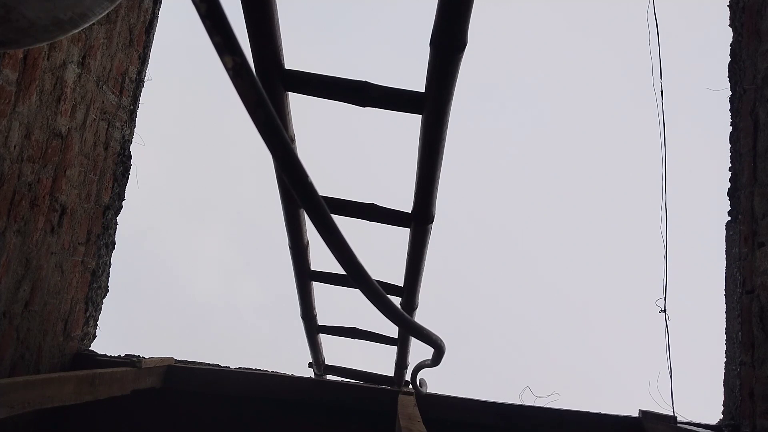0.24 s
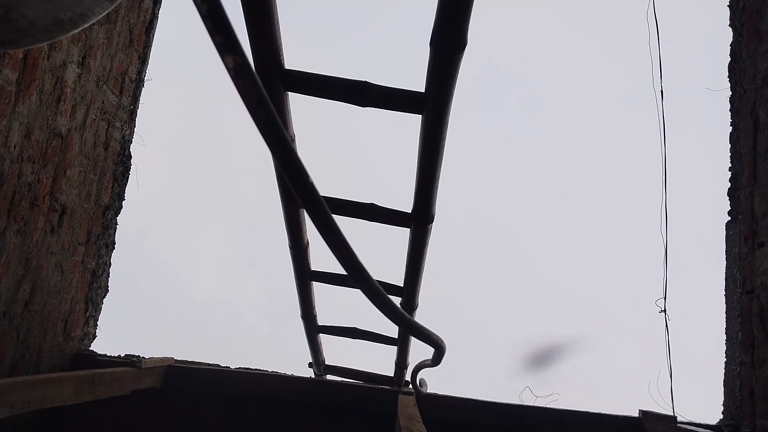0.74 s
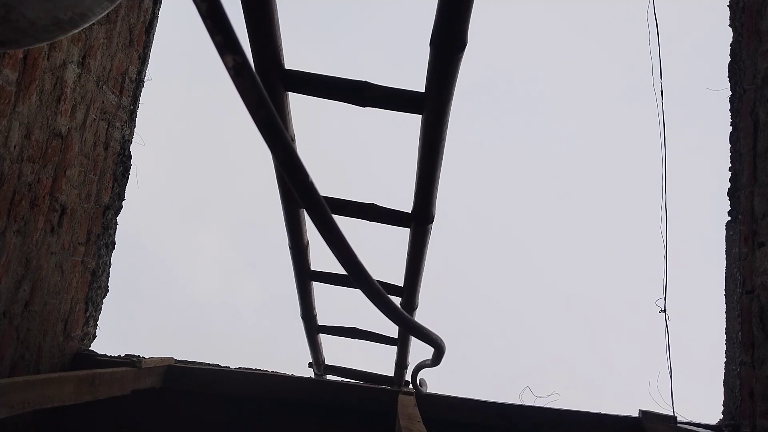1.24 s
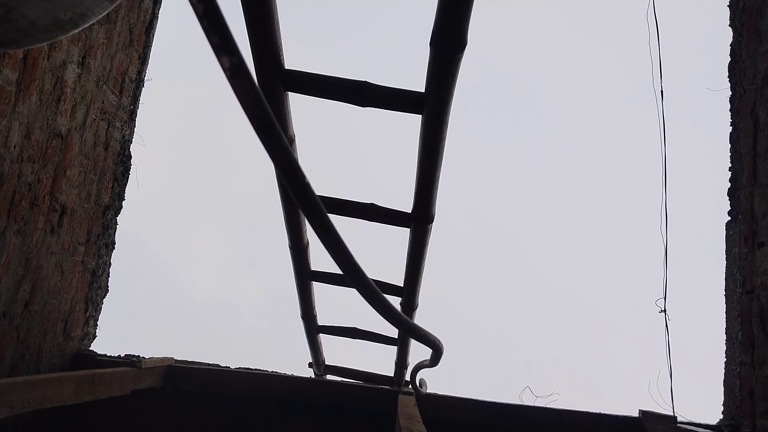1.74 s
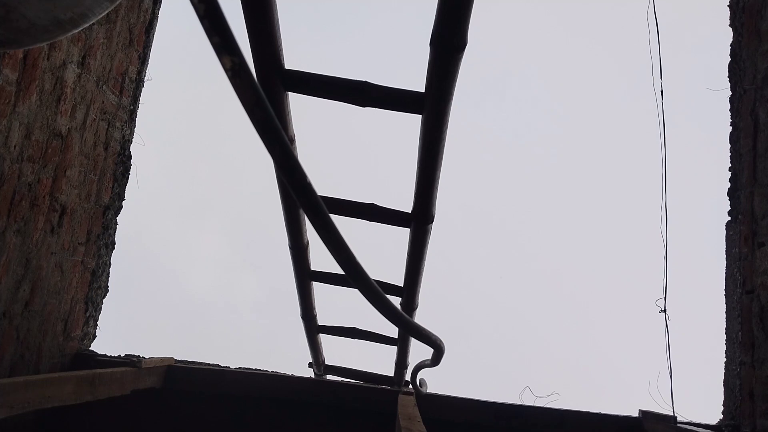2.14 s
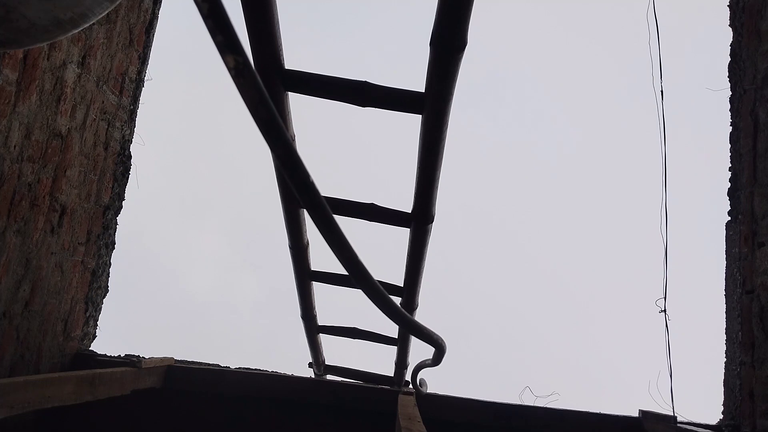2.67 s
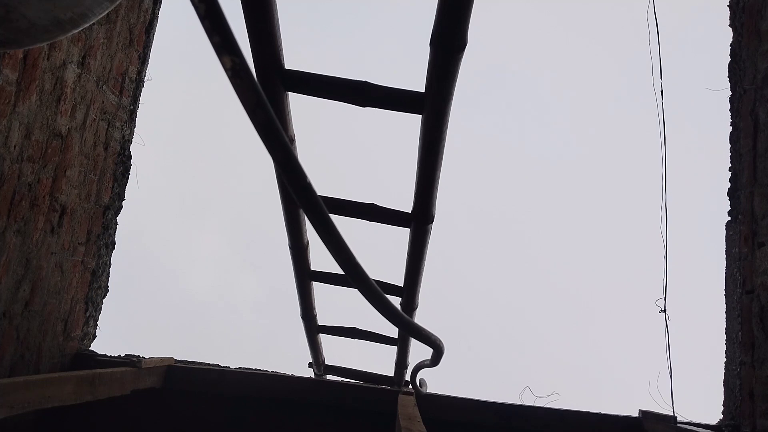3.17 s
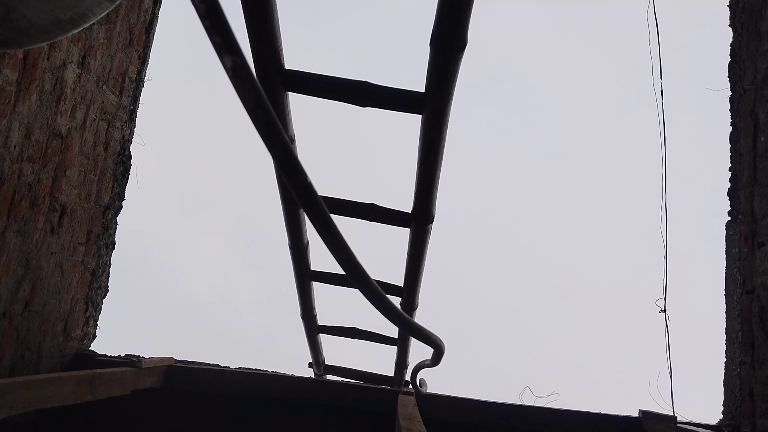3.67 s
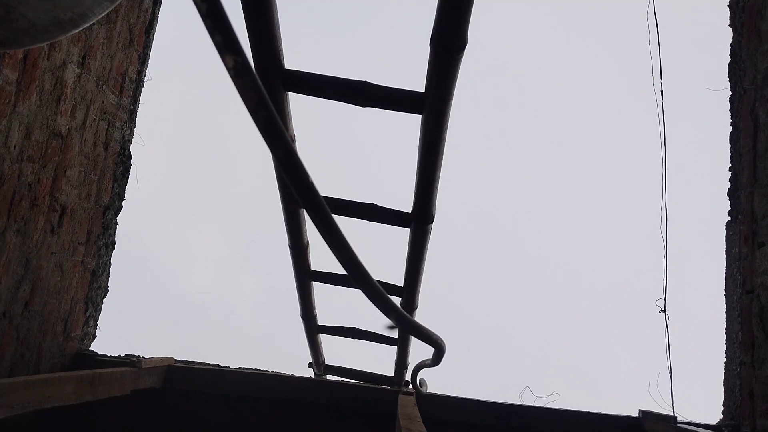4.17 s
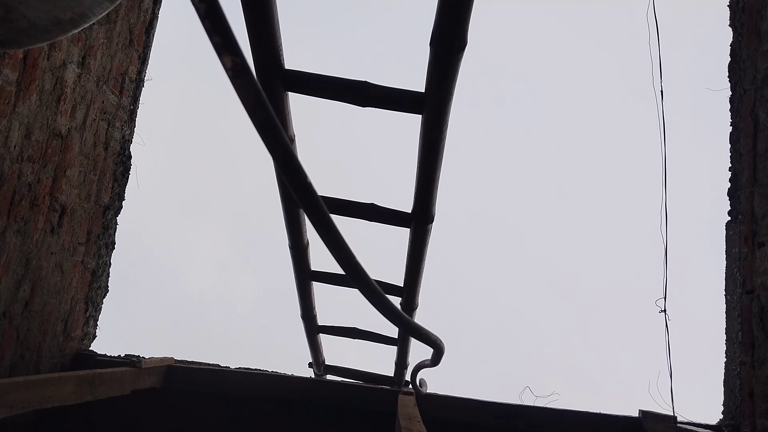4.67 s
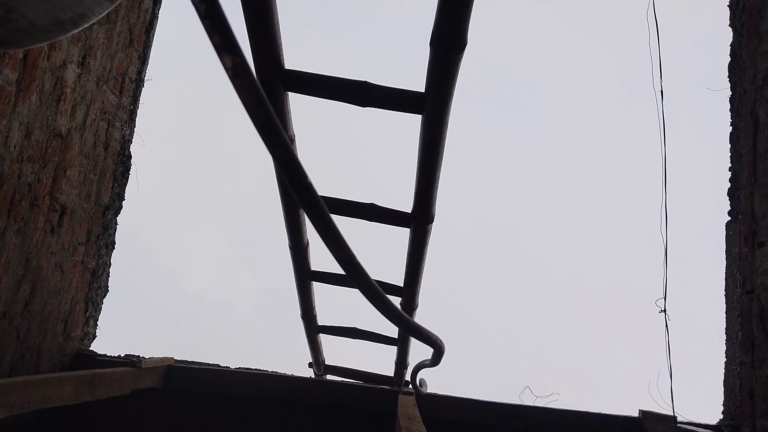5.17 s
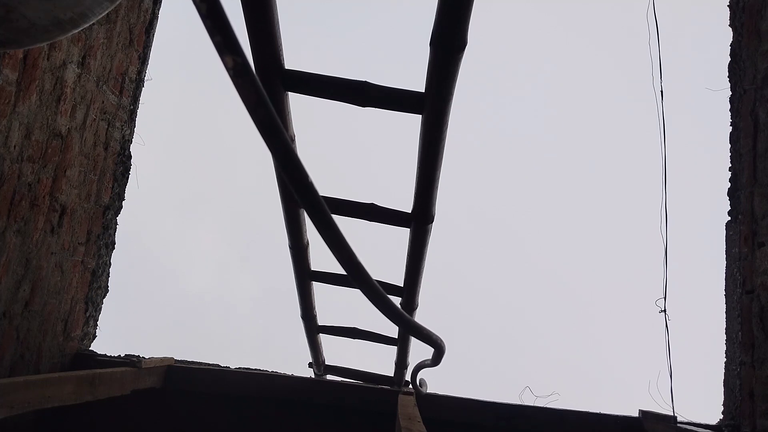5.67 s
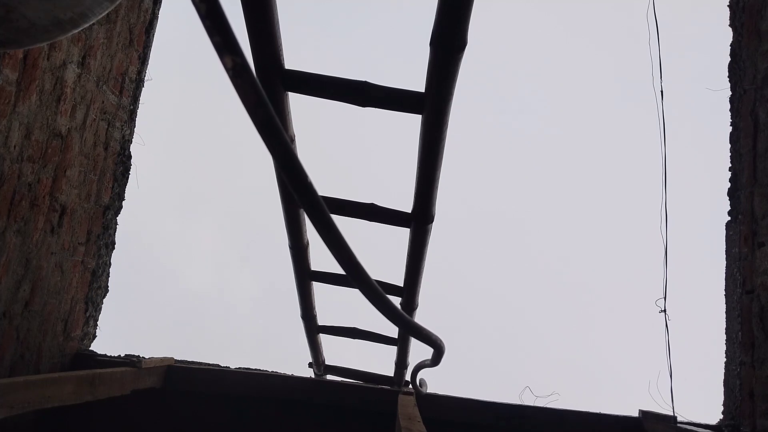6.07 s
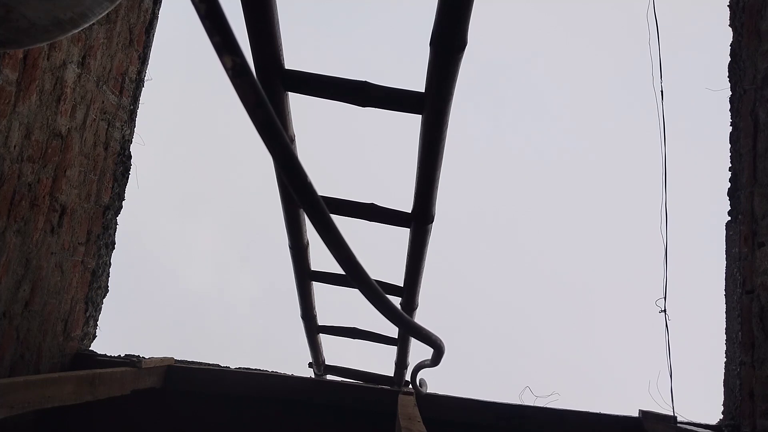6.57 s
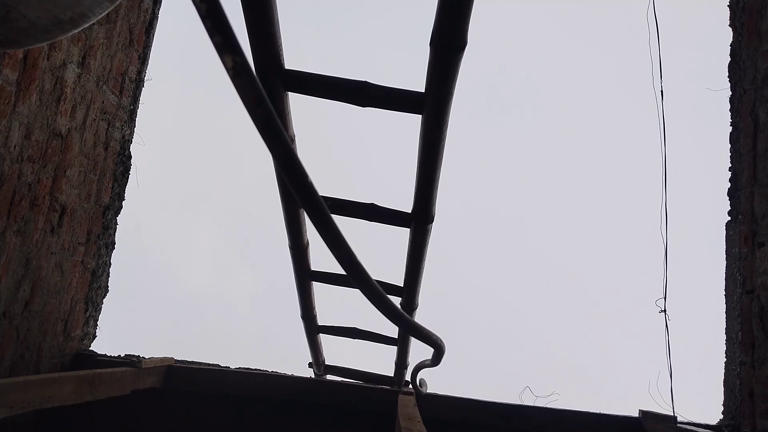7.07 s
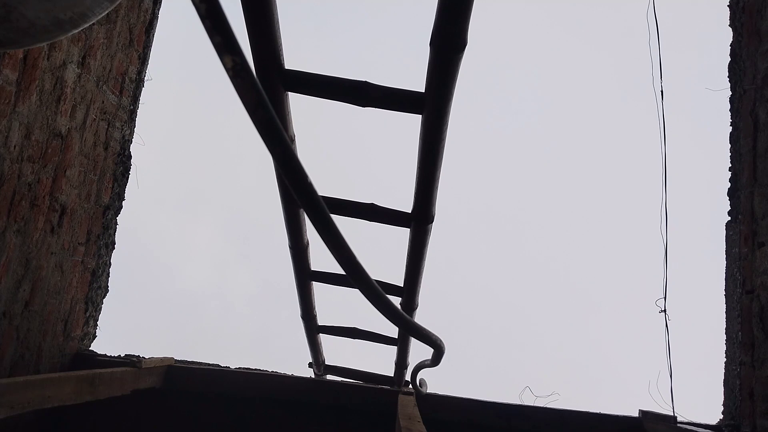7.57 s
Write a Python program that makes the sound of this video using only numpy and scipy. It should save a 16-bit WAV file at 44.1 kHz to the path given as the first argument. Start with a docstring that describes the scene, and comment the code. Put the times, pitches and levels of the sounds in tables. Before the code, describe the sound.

Close by in a narrow brick yard, a shovel scrapes through gritty wet concrete three times, with stones cracking against the blade and wet lumps thumping in. A load then thuds heavily on the ground, and a loaded metal pan is dropped and dragged with a low ring. Further off to the left, someone shuffles grit and taps steel, while a low engine hum swells and fades.

```python
"""A shovel cuts into gritty wet concrete and scrapes it up, close by in a narrow brick yard.
Grit excites the blade's modes with random impulses, stones crack against it and wet lumps thump in.
A loaded pan is dropped and dragged, ringing in its own modes. Further off on the left a second worker
shuffles grit and taps steel. Loads thud on the ground and faint tones peep, while an engine's
harmonic hum swells and fades over the rumble of the site."""
import sys
import numpy as np
from scipy import signal
from scipy.fft import rfft, irfft, next_fast_len
from scipy.io import wavfile

SR = 44100
rng = np.random.default_rng(int(sys.argv[2]) if len(sys.argv) > 2 else 0)


def transcribe(u):
    """Save the signal u as a 16-bit wav file named by the first command-line argument.

    u: samples, shape (n,) or (channels, n), limited to [-1, 1]; the rate is SR.
    q: integer samples, one column per channel.
    """
    v = np.clip(np.atleast_2d(u).T, -1, 1)
    q = np.round(v * 32767).astype(np.int16)
    wavfile.write(sys.argv[1], SR, q)


N = 344862

# upper modes of the blade, used for the pan too: (frequency [Hz], bandwidth [Hz], gain [dB])
EDGE_MODES = [(1650, 294, 8.5), (1750, 520, 8.5), (2327, 219, 8.5), (2496, 320, 6.5), (2755, 290, 7),
              (2992, 74, 3.5), (3180, 35, 10.5), (3210, 510, 1.5), (4610, 476, -0.5), (5174, 355, -1),
              (5300, 3600, -19), (5860, 690, -29)]
# lower modes of the blade, damped by the load: (frequency [Hz], bandwidth [Hz], gain [dB])
BLADE_MODES = [(180, 14, -2), (254, 52, -1), (281.4, 47.3, 6.5), (412, 53, 2.5), (562.6, 35, -5.5),
               (612, 16, -4.5), (737, 25.5, -6), (797.5, 19, -3.5), (980, 115, -13), (1160, 57, -11),
               (1355, 205, -16)]


def amp(db):
    """Amplitude ratio: a factor of ten for every 20 dB."""
    return 10 ** (np.asarray(db) / 20)


def rms_one(x):
    """Normalisation to unit mean power."""
    return x / np.sqrt(np.mean(x ** 2) + 1e-20)


def in_time(rows, **ends):
    """Linear interpolation of each column at every sample."""
    times, *columns = np.transpose(rows)
    return [np.interp(np.arange(N) / SR, times, column, **ends) for column in columns]


def at_hz(points, hz):
    """Interpolation of a spectrum on a logarithmic frequency axis."""
    frequencies, values = np.transpose(points)
    return np.interp(np.log(hz), np.log(frequencies), values)


def tent(t, peak_s, swell_s, fade_s):
    """Triangular envelope: 0 at the peak, -1 one swell before it and one fade after it."""
    return -np.maximum((peak_s - t) / swell_s, (t - peak_s) / fade_s)


def decay(impulses, tau_s):
    """Exponential decay: each impulse falls to 1/e in tau_s."""
    return signal.lfilter([1], [1, -np.exp(-1 / (tau_s * SR))], impulses + 1e-18)


def drift(corner_hz):
    """Random modulation: low-passed noise of unit rms."""
    r = np.exp(-80 * np.pi * corner_hz / SR)
    slow = signal.lfilter([1], [1, -2 * r, r * r], rng.standard_normal(N // 40 + 2002))[2000:]
    return np.interp(np.arange(N) / 40, np.arange(len(slow)), rms_one(slow))


def band(x, low_hz, high_hz):
    """Butterworth band-pass filtering."""
    sos = signal.butter(2, [low_hz, min(high_hz, .45 * SR)], "band", fs=SR, output="sos")
    return signal.sosfilt(sos, x)


def late(x, lag_s=0.0003322):
    """Path difference: sound from the side reaches the far channel later."""
    return np.interp(np.arange(N) - lag_s * SR, np.arange(N), x)


def balance(db):
    """Level difference: channel gains with the left db above the right."""
    return amp(np.array([db / 2, -db / 2]))


def placed(x, strokes, kinds):
    """Localisation by level difference: each stroke has its own direction."""
    starts = [rows[0][0] for rows in strokes]
    current = np.searchsorted(starts[1:], np.arange(N) / SR)
    return x * balance(np.array(kinds)[current, 0])


def modes(x, table, wander_db=2.2):
    """Modal superposition with alternating signs; each mode swells and fades as the contact moves."""
    out = 0
    for k, (hz, width_hz, db) in enumerate(table):
        r = np.exp(-np.pi * width_hz / SR)
        ring = signal.lfilter([1, 0, -1], [1, -2 * r * np.cos(2 * np.pi * hz / SR), r * r], x + 1e-18)
        out = out + (-1) ** k * amp(db + wander_db * drift(25.4)) * (1 - r * r) / 2 * ring
    return out


def grit(per_s, spread_db, clump_db, ahead):
    """Shot noise: uneven clicks in clumps from left, right and (weight: ahead) the front; unit rms."""
    sizes = amp(spread_db * np.minimum(rng.exponential(1, (3, N)), 5)) * rng.choice([-1, 1], (3, N))
    left, right, front = sizes * (rng.random((3, N)) < per_s / SR) * amp(clump_db * drift(30.6))
    return rms_one(np.array([left + late(right), late(left) + right]) + ahead * front)


def site():
    """Partially coherent noise in half-octave bands: the bass swells, the treble flickers."""
    # background spectrum: (frequency [Hz], relative spectral density [dB])
    spectrum = [(15, -30), (25, 8.5), (48, -8.5), (108, -9), (270, -13.5), (503, -29), (607, -21),
                (1040, -30), (1890, -45), (2990, -39.5), (7310, -51.5), (11900, -40.5), (14800, -52.5),
                (16000, -55)]
    # swell of the rumble: (time [s], relative level [dB])
    rumble = [(0, -49), (1.2, -52.5), (1.7, -50), (2.45, -56), (3.3, -48.5), (6.4, -50), (7.82, -54.5)]
    # likeness of left and right: (frequency [Hz], correlation [-1 to 1])
    coherence = [(60, 0.91), (150, 0.9), (380, 0.64), (950, -0.78), (2380, 0.22), (5980, -0.44),
                 (15000, -0.0051)]
    out, edges_hz = 0, 30 * 2 ** np.arange(0, 9.3, .5)
    common_db, flicker_db = 0.68 * drift(5), 2.6 * drift(27)
    white = rng.standard_normal((2, 2, N))
    rumble_db, = in_time(rumble)
    for k, (low, high) in enumerate(zip(edges_hz, edges_hz[1:])):
        mid, side = band(white[k % 2], low, high)
        hz = np.sqrt(low * high)
        alike = at_hz(coherence, hz)
        swell_db = (rumble_db - rumble_db.mean()) / (1 + (hz / 1200) ** 2)
        waver_db = common_db + 2.0 * drift(20) + flicker_db / (1 + (2500 / hz) ** 2)
        gain = amp(at_hz(spectrum, hz) + swell_db + waver_db)
        out = out + gain * (np.sqrt(1 + alike) * mid + np.sqrt(1 - alike) * side * [[1], [-1]])
    return amp(-41.5) * rms_one(out)


def yard(x, t60_s=0.16):
    """Reverberation between brick walls: six feedback delays a side, losing treble on each pass."""
    size = next_fast_len(N + SR // 2)
    w = np.linspace(0, np.pi, size // 2 + 1)
    lags = (rng.uniform(.006, .024, (2, 6, 1)) * SR).astype(int)
    loop = amp(-60 * lags / SR / t60_s) * np.exp(-1j * w * lags) / (1 + (w / 2.0) ** 2)
    return irfft(rfft(x, size) * (loop / (1 - loop)).sum(axis=1), size)[:, :N]


def engine():
    """Periodic firing gives a harmonic series that wavers a little, with a rough puff each cycle."""
    # running state: (time [s], firing rate [Hz], order 1 [dB], order 2 [dB], order 3 [dB])
    running = [(0, 35.73, -39.5, -55, -65), (.39, 35.78, -40, -47, -54), (.74, 37.18, -43, -34, -45.5),
               (1.2, 36.75, -42, -49, -53.5), (1.6, 37.96, -45.5, -41, -53),
               (2.7, 38.29, -36.5, -34.5, -54), (3.07, 38, -37, -30, -40), (3.55, 38.74, -41, -30, -38.5),
               (4.15, 40.13, -41, -33.5, -48), (4.75, 39.98, -54, -35, -51.5),
               (5.2, 40.93, -39.5, -31, -68), (5.65, 40.8, -40, -41.5, -50.5),
               (5.9, 40.3, -38.5, -40.5, -53.5), (6.35, 38.36, -62, -45, -50.5),
               (7.15, 36.51, -50, -49.5, -54), (7.82, 35.6, -48.5, -52, -56)]
    # upper harmonics: (order [multiple of firing rate], level [dB re order 2])
    high_orders = [(5, -25.5), (7, -27.5), (8, -26)]
    hz, first_db, second_db, third_db = in_time(running)
    levels = [first_db, second_db, third_db, third_db - 0.5]
    phase = 2 * np.pi * np.cumsum(hz * (1 + 0.0073 * drift(3.04))) / SR
    hum = sum(amp(db + drift(4.9)) * np.sin((k + 1) * phase + k) for k, db in enumerate(levels))
    hum += sum(amp(second_db + db + 4.7 * drift(5.7)) * np.sin(k * phase) for k, db in high_orders)
    puffs = band(rng.standard_normal(N), 180, 680) * (1 + np.cos(phase)) ** 2
    return np.sqrt(2) * hum + amp(second_db - 28) * rms_one(puffs)


def peeps():
    """Windowed sinusoids: three faint tones near 2 kHz, and one so short it is heard as a knock."""
    # tone bursts: (time [s], duration [s], frequency [Hz], relative level [dB])
    bursts = [(3.855, 0.057, 2030, -63), (5.311, 0.039, 2270, -62), (5.713, 0.058, 2276, -60),
              (6.763, 0.0053, 1170, -49)]
    out = np.zeros(N)
    for s, length, hz, db in bursts:
        t = np.arange(int(length * SR)) / SR
        window = np.sin(np.pi * t / length)
        out[int(s * SR):][:len(t)] += amp(db + 7.5) * window * np.sin(2 * np.pi * hz * t)
    return out


def thuds(gap_s=.0125, span_db=25, scatter_db=3):
    """Impact of loads, lump by lump: half-sine forces on the ground, shorter for a harder load."""
    # landings: (peak time [s], relative level [dB], build-up [s], tail [s], hardness [Hz])
    loads = [(5.433, -30, .005, .01, 300), (5.487, -10.5, .004, .1, 450), (5.879, -26, .005, .01, 300),
             (5.951, -30, .005, .01, 250), (6.077, -5.5, .13, .16, 261)]
    # ground resonances: (frequency [Hz], bandwidth [Hz], gain [dB])
    ground_modes = [(95.4, 21.3, 6.5), (193.4, 18.9, 6), (255, 40, 1.5), (375, 72, -2), (576, 88, -13.5),
                    (800, 620, -19)]
    force, slots = np.zeros(N), np.arange(-8, 9)
    for s, db, build_s, tail_s, hz in loads:
        jitter, scatter = rng.standard_normal((2, len(slots)))
        push = np.sin(np.pi * np.arange(0, 1, 2 * hz / SR))
        times = s + gap_s * (slots + 0.249 * jitter * (slots != 0))
        shape = tent(times, s, build_s, tail_s)
        gains = amp(db + 35 + span_db * shape + scatter_db * scatter)
        for t, gain in zip(times, gains * (shape > -.5)):   # silent below half the span
            force[int(t * SR):][:len(push)] += gain * push / push.sum()
    return modes(force, ground_modes)


def shuffles(clicks, span_db=36.5):
    """Filtered shot noise: shuffled grit swells and fades above a constant trickle."""
    # movements: (peak time [s], swish level [dB], swell [s], fade [s], coarse grit [dB re swish])
    moves = [(.06, -46.5, 0.44, 0.19, 0), (.802, -43.5, 0.24, 0.26, -4), (1.48, -60.5, 0.045, 0.31, 7),
             (2.37, -65.5, .05, 0.83, -18), (3.326, -53, 0.33, 0.37, -0.5), (3.578, -36.5, 0.16, 0.11, -7),
             (3.808, -60, 0.082, 0.064, 12.5), (4.052, -70, .17, 0.57, 11.5), (4.74, -53, 0.097, 0.69, 5.5),
             (5.48, -53.5, .08, 0.24, 1), (5.78, -59, 0.025, 0.089, 4.5), (6.212, -45.5, 0.18, 0.27, -2.5),
             (6.41, -55.5, 0.034, 0.77, -8), (6.94, -61, 0.025, 0.17, 5)]
    # resonances of the swish: (frequency [Hz], bandwidth [Hz], gain [dB])
    swish_modes = [(3780, 1050, 2), (5500, 1330, 6.5), (5920, 8100, -9)]
    # resonances of coarse grit: (frequency [Hz], bandwidth [Hz], gain [dB])
    coarse_modes = [(1690, 1210, -2), (2716, 760, 0), (3034, 485, -2)]
    swish, coarse = rms_one(modes(clicks, swish_modes)), rms_one(modes(clicks, coarse_modes))
    sand = rms_one(band(clicks, 4250, 16200))
    swish_gain = coarse_gain = 0
    for s, db, swell_s, fade_s, coarse_db in moves:
        shape_db = span_db * tent(np.arange(N) / SR, s, swell_s, fade_s)
        swish_gain += amp(db + shape_db)
        coarse_gain += amp(db + coarse_db + 0.79 * shape_db)
    trickle = amp(-63.5) * coarse + amp(-80) * sand
    return swish_gain * (swish + amp(-10.5) * sand) + coarse_gain * coarse + trickle


def steel_taps(clicks, scatter_db=3.5):
    """Damped free vibration: each tap rings the steel briefly and raises a puff of dust."""
    # taps: (time [s], relative level [dB], brightness of the dust [dB])
    taps = [(0.171, -34, -24), (0.252, -22, -24.5), (0.5767, -26, -26), (1.4905, -23, -30),
            (2.388, -27.5, -21), (3.1946, -24, -28), (3.5293, -37, 5), (3.573, -30.5, -0.5),
            (3.7513, -37, -28), (3.7875, -37, -31), (4.0223, -55, -19), (4.06, -29.5, -18.5),
            (5.1416, -22, -25.5), (5.449, -33, -14), (5.7828, -24, -22), (6.136, -39, -22),
            (6.2138, -17, -45.5), (6.4185, -48, 10.5), (6.5227, -48, 9.5), (6.5797, -29, -36),
            (7.583, -40.5, -18)]
    # modes of the steel: (frequency [Hz], gain [dB], 60 dB decay time [s])
    steel_modes = [(1790, -3, .026), (2040, -4, .024), (2300, -3, .026), (2930, -6, .026), (3250, -9, .022)]
    s, db, bright_db = np.transpose(taps)
    at, rings = (s * SR).astype(int), 0
    chances_db = rng.normal(0, scatter_db, (len(s), len(steel_modes)))
    for (hz, mode_db, t60), chance_db in zip(steel_modes, chances_db.T):
        hits = np.zeros(N)
        hits[at] = amp(db + mode_db + chance_db - 29.5)
        force = decay(hits, 0.0049) * rng.standard_normal(N)   # grit smears a tap into noise
        r, w = amp(-60 / (t60 * SR)), 2 * np.pi * hz / SR
        rings = rings + signal.lfilter([0, np.sin(w)], [1, -2 * r * np.cos(w), r * r], force)
    puffs = np.zeros(N)
    puffs[at] = amp(db + bright_db - 4.5)
    dust = decay(puffs, 0.017) * rms_one(band(clicks, 1870, 8600))
    return dust + [rings, late(rings)]


def far_worker():
    """A level difference sets the second worker's shuffles and taps on the left."""
    clicks = grit(5000, 1.4, clump_db=2.0, ahead=1.0)
    return (shuffles(clicks) + steel_taps(clicks)) * balance(4.0)[:, None]


def scrape(strokes, kinds, body_modes, bite_s=0.065, fill_db_per_s=7.5):
    """Forced vibration: grit under steel drives its upper and lower modes; sand hisses on top."""
    clicks = grit(2400, 3.8, clump_db=1.8, ahead=.6)
    edge = rms_one(modes(clicks, EDGE_MODES))
    lower = modes(grit(1100, 3.6, clump_db=0.2, ahead=1.23), body_modes)
    body, hollow = rms_one(band(lower, 547, 4000)), rms_one(band(lower, 84, 417))
    sand, out = rms_one(band(clicks, 2500, 17300)), 0
    for rows, (_, hollow_db, bite_db) in zip(strokes, kinds):
        level = amp(in_time(rows, left=-120, right=-120)[0])
        weight = amp(in_time(rows)[1])
        since = np.arange(N) / SR - rows[1][0]   # the steel bites at the second row
        hiss = 1 / (1 / (amp(-15) * level) + 1 / amp(-40.5))   # follows the grit up to a soft ceiling
        bite = amp(bite_db) * np.exp(-np.abs(since) / bite_s) * (since > 0)
        fill = amp(hollow_db + fill_db_per_s * np.clip(since, 0, 1))   # grows as the load gathers
        out = out + level * (edge + weight * (body + fill * hollow)) + (hiss + bite) * sand
    return out


def blows(table, strokes, body_modes, knock_db, spray_db):
    """Impulse excitation: a dry crack, a knock in the lower modes and a spray of grit on the edge."""
    s, db, body_db = np.transpose(table)
    grit_db = np.interp(s, *np.concatenate(strokes).T[:2])
    cracks, knocks, sprays = np.zeros((3, N))
    at = (s * SR).astype(int)
    cracks[at], knocks[at], sprays[at] = amp(db), amp(db + body_db + knock_db), amp(grit_db + spray_db)
    grains = decay(sprays, 0.0095) * grit(4000, 0.97, clump_db=-4.2, ahead=1.0)
    spray = amp(-12) * band(grains, 4500, 13600) + amp(8) * modes(grains, EDGE_MODES)
    crack = band(band(cracks, 1630, 4150), 1630, 4150) + amp(-16) * band(cracks, 4700, 5600)
    crack = np.array([crack + .4 * late(crack), late(crack) + .08 * crack])   # direct and off a wall
    return amp(10.5) * crack + spray + modes(knocks, body_modes)


def steel_pan():
    """Impact and friction: the loaded pan rings low as it drops, bounces and is dragged."""
    # one envelope per drag: (time [s], grit level [dB], ringing [dB re grit])
    drags = [
        [(6.947, -46, 6), (6.954, -28, 5), (6.975, -35, 18.5), (7.035, -50, 19.5), (7.045, -31.5, 3),
         (7.13, -69.5, 15)],
        [(7.195, -47, -10), (7.203, -33, 3), (7.255, -37, 4), (7.31, -36.5, -1.5), (7.327, -37.5, 7),
         (7.45, -51, 1.5), (7.49, -71, 5)],
    ]
    # per drag: (left minus right [dB], lowest modes [dB re other lower modes], sand burst [dB])
    kinds = [(1.1, 2.997, -44), (1.099, 2.5, -47)]
    # blows on the ground: (time [s], relative crack level [dB], relative ringing [dB])
    bounces = [(6.953, -15, -2), (6.962, -10.5, 7.5), (6.976, -21, 12), (7.041, -18.5, -0.5),
               (7.203, -18.5, -6), (7.222, -14.5, -2), (7.265, -12, -18), (7.327, -10, -10),
               (7.372, -26, -9), (7.402, -29, -10)]
    # modes of the pan: (frequency [Hz], bandwidth [Hz], gain [dB])
    pan_modes = [(94, 7.9, 7.5), (184.8, 24, -1.5), (275, 63, 4.5), (442, 144, -3), (587, 23.6, 4.5),
                 (763, 22, 2.5), (890, 40, -6), (1297, 150, -12), (1340, 23, -8), (1526, 96, -10.5),
                 (2000, 48, -15.5), (2440, 36, -22), (3220, 83, -24)]
    landings = blows(bounces, drags, pan_modes, knock_db=35, spray_db=4.5)
    return placed(scrape(drags, kinds, pan_modes) + landings, drags, kinds)


def wet_lumps():
    """Soft impacts carry little treble, so wet lumps move only the blade's lowest modes."""
    # thumps into the blade: (time [s], relative level [dB])
    thumps = [(1.971, -12), (2.059, -13), (2.17, -11), (2.196, -9), (4.514, -21.5), (4.597, -19)]
    s, db = np.transpose(thumps)
    force = np.zeros(N)
    force[(s * SR).astype(int)] = amp(db + 35)
    return modes(band(force, 120, 760), [mode for mode in BLADE_MODES if mode[0] < 600])


def shovel():
    """Friction and impact excite the blade's modes in three strokes, the first from the left."""
    # one envelope per stroke: (time [s], grit level [dB], load weight as lower modes [dB re grit])
    strokes = [
        [(.912, -55, -2), (.92, -30.5, 5), (.96, -29.5, -7.5), (1.01, -29.5, -14), (1.07, -41.5, -10),
         (1.12, -68, -5)],
        [(1.737, -39, -6), (1.743, -22, -4.5), (1.825, -34.5, 8), (1.86, -20.5, -3.5), (1.94, -15.5, -3.5),
         (2.005, -23, 2.5), (2.165, -16, 1), (2.22, -20.5, -4), (2.29, -27.5, 4.5), (2.37, -76, 16)],
        [(4.286, -32, -8), (4.296, -22, -2.5), (4.4, -25.5, 0.5), (4.445, -27.5, 1), (4.53, -19.5, 0.5),
         (4.62, -24.5, 0.5), (4.66, -37.5, 0), (4.72, -57, -2)],
    ]
    # per stroke: (left minus right [dB], lowest modes [dB re other lower modes], sand burst [dB])
    kinds = [(5, -3.5, -55), (-0.3, -5.5, -31.5), (.8, -8.5, -35.5)]
    # stones against the blade: (time [s], relative crack level [dB], relative knock [dB])
    stone_hits = [(.919, -3, -3), (.9825, -8, -17), (.992, 3.5, -24), (1.0055, -2.5, -34),
                  (1.0655, -11, -26), (1.744, -20, -12), (1.851, -17, -21), (1.927, -7, -15),
                  (1.938, -5, 1), (2.02, 3, -12), (2.0885, 0.5, -24), (2.123, 2, -4.5), (2.169, -2, -5),
                  (2.2045, 3.5, -3), (2.244, -14, -6), (4.294, -8, -41), (4.459, 6, -33), (4.479, -3, -17),
                  (4.513, -7, 3), (4.535, -2, -2), (4.557, -5, 1.5)]
    # light stones hardly move the lowest modes
    struck_modes = [mode for mode in BLADE_MODES if mode[0] > 500]
    stones = blows(stone_hits, strokes, struck_modes, knock_db=30, spray_db=-3.5)
    return placed(scrape(strokes, kinds, BLADE_MODES) + stones + wet_lumps(), strokes, kinds)


def scene():
    """Superposition of the work, its reflections, engine and site; the walls return little bass."""
    work = shovel() + steel_pan() + far_worker() + peeps() + thuds()
    return work + amp(-12) * yard(band(work, 320, .45 * SR)) + engine() + site()


def record(dry, stopband_hz=16274):
    """Soft saturation rounds the peaks; a steep low-pass cuts the top."""
    lowpass = signal.cheby2(14, 70, stopband_hz, fs=SR, output="sos")
    return signal.sosfilt(lowpass, 1.2 * np.tanh(dry / 1.2))


dry = scene()
out = record(dry)
transcribe(out)
```